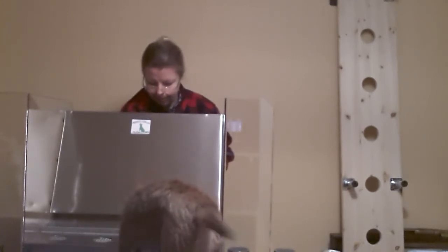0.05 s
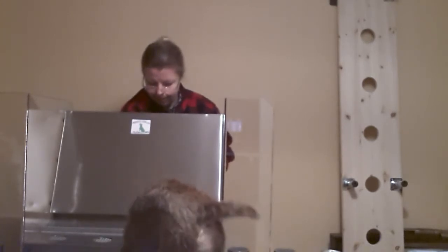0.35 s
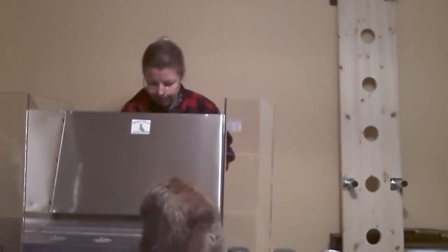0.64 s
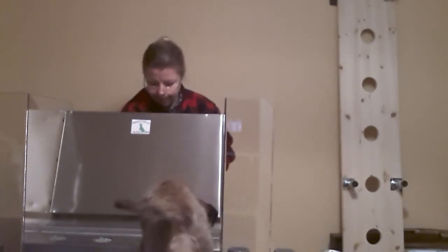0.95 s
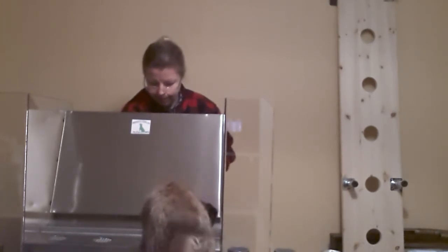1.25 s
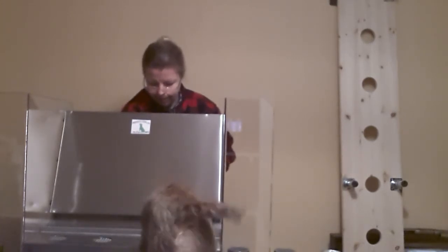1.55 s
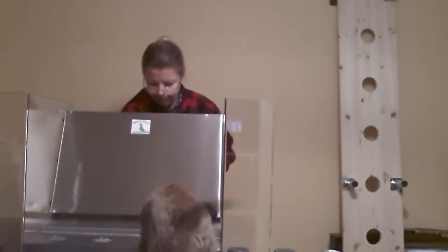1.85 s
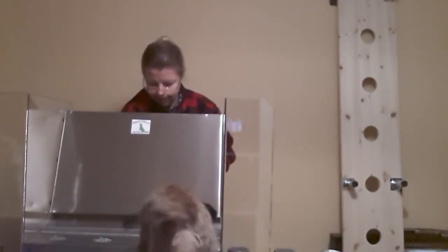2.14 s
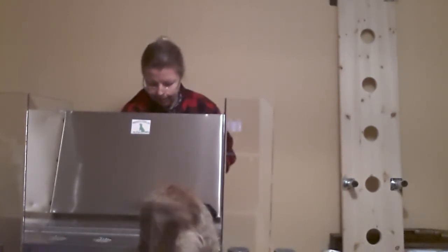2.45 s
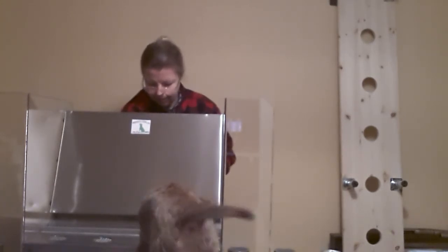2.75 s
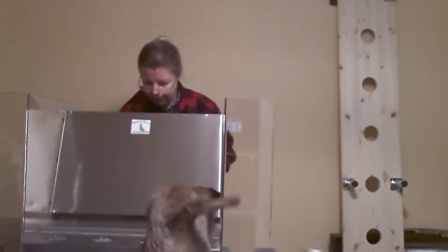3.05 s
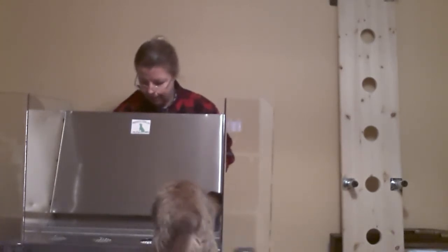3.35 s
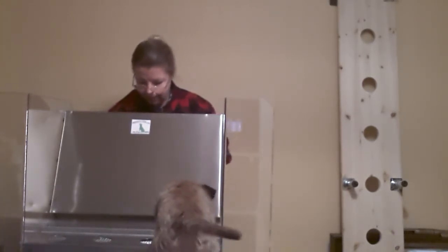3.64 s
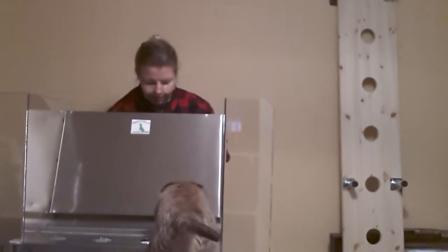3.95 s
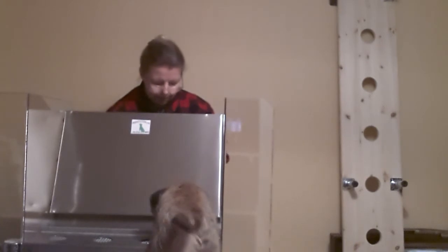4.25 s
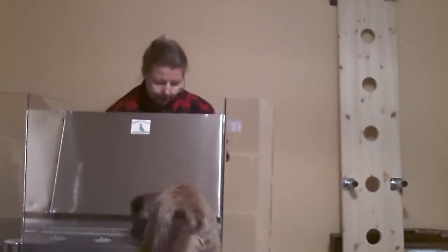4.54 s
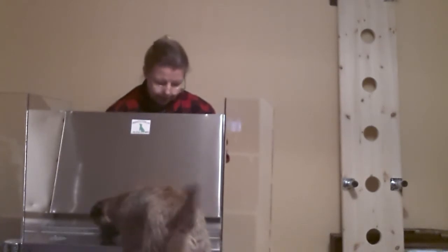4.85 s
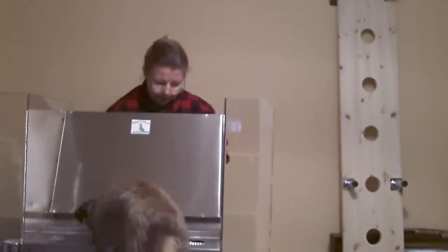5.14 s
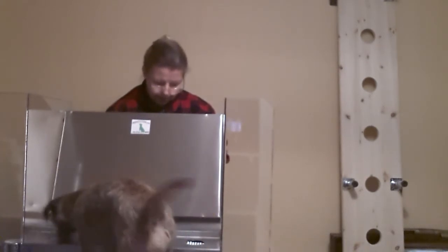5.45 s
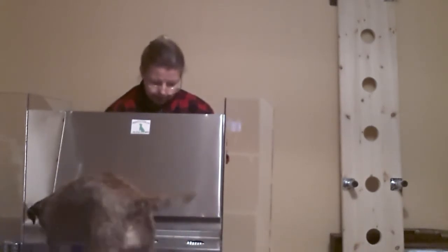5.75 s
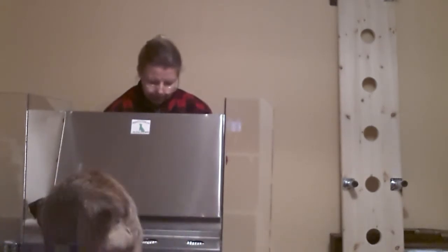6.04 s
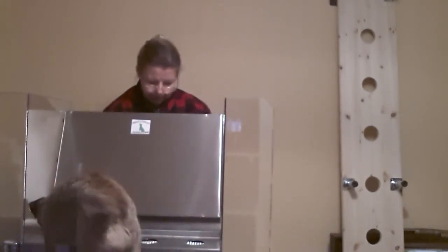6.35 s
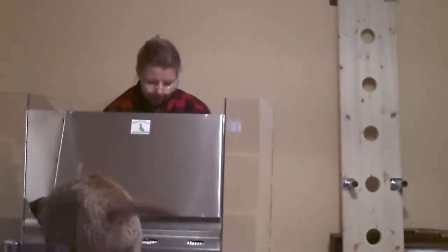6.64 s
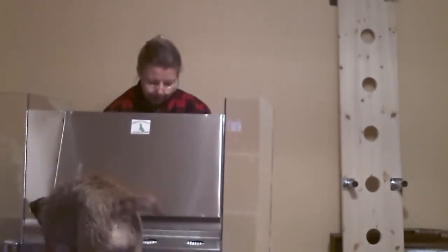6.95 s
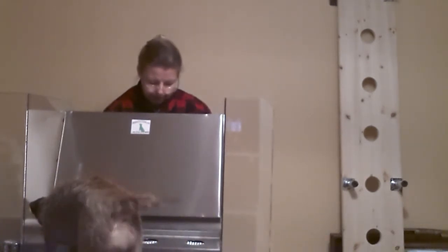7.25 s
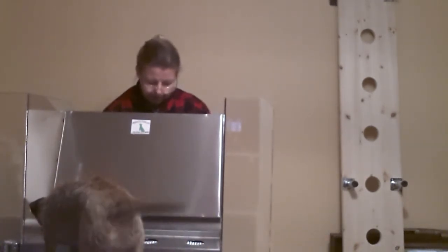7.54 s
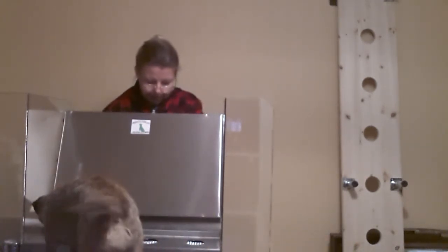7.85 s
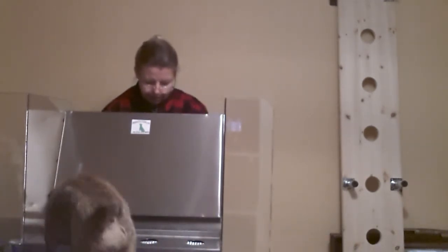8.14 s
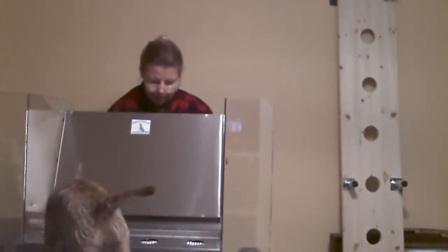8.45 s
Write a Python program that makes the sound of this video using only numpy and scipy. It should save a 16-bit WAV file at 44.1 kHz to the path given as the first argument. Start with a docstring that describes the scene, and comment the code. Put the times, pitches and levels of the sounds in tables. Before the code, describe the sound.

A dog scuffs around a stainless-steel station; a training clicker snaps twice, each time followed by metal clanks and a rolling reward.

```python
"""A stainless-steel scent station clanks and rings as a dog works it in a small, hard room. Twice a training
clicker snaps down and up, its spring leaf flipping in a hollow case, the second press with a low, dull thump;
then a reward clanks through the station and rolls over the sheet metal, making it rumble and sing. Before and
in between, the dog scuffs about, with light taps and soft blips, and bumps the steel, once hard. Faint room
noise and microphone hiss lie under it all."""
import sys
import numpy as np
from scipy import signal
from scipy.fft import rfft, irfft
from scipy.io import wavfile
from scipy.ndimage import uniform_filter1d

SR = 44100
rng = np.random.default_rng(int(sys.argv[2]) if len(sys.argv) > 2 else 0)


def to_wav(sig):
    """Store sig (one row per channel, or 1-D mono) as 16-bit WAV at the path in sys.argv[1].

    Samples outside -1..1 are clipped; the rate is SR.
    """
    pcm = np.clip(np.atleast_2d(sig), -1, 1) * 32767
    pcm = np.round(pcm).astype(np.int16)
    wavfile.write(sys.argv[1], SR, pcm.T)  # frames by channels


N = 379260
EVENT_SIZE = 65536  # samples in one short sound
AGE = np.arange(EVENT_SIZE) / SR
HZ, ALL_HZ = np.fft.rfftfreq(EVENT_SIZE, 1 / SR), np.fft.rfftfreq(N, 1 / SR)

# Levels are relative. A "colour" says how strong each pitch is; t60 is the time to fade by 60 dB.
# colour of the room noise and microphone hiss: f/Hz, level/dB
BACKGROUND_COLOUR = [(12, -62), (20, -34), (106, -6), (217, -8), (249, -10), (328, -10), (455, -13),
                     (567, -14.5), (766, -16.5), (1120, -18), (1290, -18.5), (3020, -22), (3460, -23.5),
                     (7060, -26.5), (14000, -21.5)]
# stereo width of that noise: f/Hz, side minus mid/dB
BACKGROUND_WIDTH = [(60, 3), (110, -3), (200, 0.5), (370, -0.5), (680, 0.5), (1260, 0), (2310, 0),
                    (4250, -0.5), (7810, 0.5), (14400, -0.5)]
# stereo width of sounds in the room, low notes narrow and high ones wide: f/Hz, side minus mid/dB
ROOM_WIDTH = [(30, 9), (120, -21.5), (250, -18), (500, -8), (1000, -0.5), (12000, -0.5)]
# scuffs of the dog: loudest t/s, level/dB
DOG_SCUFFS = [(.105, -48.5), (0.331, -55), (.58, -56), (.815, -52.5), (.915, -45), (1.054, -40),
              (5.22, -52.5), (5.342, -48.5), (5.67, -57), (5.74, -49), (6.016, -46)]
# colour of a scuff, before its treble is turned down: f/Hz, level/dB
FRICTION_COLOUR = [(60, -53), (230, 1), (650, 4), (1000, 0), (2000, -1.5), (4200, -0.5), (6000, -9),
                   (9000, -10.5), (14000, -20.5)]
# soft, hollow blips: t/s, level/dB
SOFT_BLIPS = [(.555, -46), (.685, -44), (1.0, -41), (1.04, -39), (1.09, -40.5), (1.19, -43.5),
              (3.98, -42.5)]
# light, dull taps, the last one the low thump of a clicker press: t/s, level/dB, centre f/Hz
LIGHT_TAPS = [(0.792, -42, 330), (0.903, -39.5, 950), (4.563, -42.5, 2510), (4.84, -43, 518),
              (4.861, -51, 230), (5.108, -43.5, 2343), (5.294, -43.5, 454), (5.365, -30, 530),
              (5.515, -50.5, 248), (5.702, -47.5, 262), (5.992, -48, 1500), (6.025, -41, 260),
              (7.56, -41, 191)]
# how fast a struck thing and the room die away together: f/Hz, t60/s
FADE_TIMES = [(150, 0.43), (400, 0.32), (1000, 0.28), (2700, 0.26), (7000, 0.25), (14000, 0.18)]
# snaps of the clicker: t/s, level/dB, hollow body/dB, top treble/dB, ping f/Hz, ping level/dB
CLICKER_SNAPS = [(2.464, -19, -7, -18, 3210, -10), (2.562, -12.5, -7.5, -29, 6550, -5),
                 (7.556, -12.5, 3.5, -11.5, 3410, -12), (7.67, -11.5, -6, -24, 6330, -3)]
# colour of the clicker: f/Hz, level/dB
CLICKER_COLOUR = [(40, -44), (140, -29), (230, -10), (390, 2), (480, -7.5), (720, 6), (930, -11.5),
                  (1300, -7), (2300, -17.5), (3400, -7.5), (4400, -3), (5600, -9.5), (6500, -3.5),
                  (9500, -9.5), (14500, -17.5)]
# blows on the steel: t/s, level/dB, hardness as cutoff f/Hz, boom/dB, ping f/Hz, ping level/dB
STEEL_BLOWS = [(2.661, -20.5, 880, -12, 355.6, -4), (2.829, -22, 1670, 0, 4270, -5),
               (2.851, -15.5, 1350, 5, 576, -14), (2.869, -19, 1130, 7, 813, -17),
               (2.972, -20, 4100, -20, 2550, 2.5), (2.990, -16, 3300, -31, 1637, -6),
               (3.081, -37.5, 503, 8, 220.4, -1), (3.116, -28, 810, -11, 407.3, -2.5),
               (3.169, -30.5, 4600, -24, 4270, -1.5), (3.347, -35, 400, 34, 228.4, -1),
               (3.415, -42.5, 3125, 1, 4080, 3), (3.821, -47.5, 3480, -12, 3000, 1),
               (4.096, -13.5, 1230, -3, 410.5, -14), (4.099, -23.5, 9000, 8, 4670, -12),
               (4.116, -13.5, 2900, -0.5, 3547, -1.5), (7.522, -49.5, 605, 10, 347, -7.5),
               (7.965, -24, 980, -10, 976, -7), (8.055, -24, 1370, 2, 423, -2.5),
               (8.087, -12.5, 2600, -10, 1139, -9), (8.108, -19, 2400, -8, 2460, 4),
               (8.165, -19, 2020, -18, 443, -14), (8.322, -25, 1020, -2, 578, -8),
               (8.572, -29.5, 1600, 19, 1690, -32)]
# the steel panel's modes (the notes it rings at by itself): f/Hz, level/dB, t60/s
PANEL_MODES = [(218, -11, 0.66), (324, -15, 1.2), (342.7, -14, 0.94), (361.4, 0, 0.22), (410.7, -9, 1.056),
               (426, -8, 0.65), (458, -15, 0.1), (551.7, -2, 0.19), (616, -2.5, 0.41), (715, -10, 0.51),
               (790, -10, 0.47), (904, -22.5, 1.8), (990, -3.5, 0.42), (1150, -10.5, 0.41),
               (1155, -12, 0.24), (1398, -4.5, 0.27), (1458, -6.5, 0.49), (1566, -4, 0.35),
               (2200, -8, 0.17), (2250, -5, 0.19), (2800, -2, 0.24), (3360, -7.5, 0.38)]
# colour of the sheet's crowd of finer modes: f/Hz, level/dB
SHEET_COLOUR = [(30, -50), (100, -25.5), (170, -27), (225, -5.5), (275, -10.5), (340, 0.5), (600, 3),
                (950, -0.5), (1300, -4.5), (2200, -2.5), (3200, -8), (4500, -4), (6000, -11), (9000, -9.5),
                (14000, -49.5)]
# rattling from a rolling reward or, faintly, the dog's weight: t/s, level/dB, length/s, hiss/dB
RATTLES = [(2.7, -32, .76, -1), (4.69, -60.5, 0.54, -2.5), (8, -31, .76, -3)]
# colour of rolling on the sheet: f/Hz, level/dB
ROLLING_COLOUR = [(40, -31), (120, -17.5), (180, -5.5), (225, 6), (275, -3.5), (380, 2), (650, -3),
                  (1000, -7), (1600, -13), (4200, -14), (6000, -23.5), (9000, -25.5), (14000, -49.5)]


def amp(db):
    """Turns decibels into a gain."""
    return 10 ** (np.asarray(db) / 20)


def unit(x):
    """Scales a signal to an average (rms) size of 1."""
    return x / np.sqrt(np.mean(x ** 2) + 1e-20)


def read(points, hz):
    """Reads between a table's rows, on a log-frequency axis."""
    f, value = np.transpose(points)
    return np.interp(np.log(hz + 1), np.log(f + 1), value)


def below(hz, corner_hz):
    """Gain that keeps the lows and falls 12 dB per octave above the corner."""
    return 1 / np.sqrt(1 + (hz / corner_hz) ** 4)


def add(mix, s, sound):
    """Mixes a stereo sound in at s seconds."""
    at = round(s * SR)
    sound = sound[:, max(-at, 0):]
    part = mix[:, max(at, 0):][:, :sound.shape[1]]
    part += sound[:, :part.shape[1]]


def diffuse(pair, colour, width=ROOM_WIDTH):
    """Colours two noises: both ears share one (mid), the other sets them apart (side)."""
    size = pair.shape[1]
    mid, side = rfft(pair) * colour
    side = side * amp(read(width, np.fft.rfftfreq(size, 1 / SR)))
    return unit(irfft(np.array([mid + side, mid - side]), size))


def grains(size, spread_db):
    """Two dense streams of tiny contacts of uneven strength."""
    noise, strength = rng.standard_normal((2, 2, size))
    return noise * amp(spread_db * np.clip(strength, -3, 3))


def background(level_db=-55):
    """Steady room noise and microphone hiss."""
    colour = amp(read(BACKGROUND_COLOUR, ALL_HZ))
    return amp(level_db) * diffuse(rng.standard_normal((2, N)), colour, BACKGROUND_WIDTH)


def scuffs(lead_s=0.19, tail_t60=0.33, shuffle_span_s=(4.1, 6.4), shuffle_db=-56.5, count=8):
    """Grainy rubbing swells and fades into the room; the dog adds faint shuffles as it crosses."""
    out = np.zeros((2, N))
    t = AGE - lead_s
    shuffles = [(s + .04 * rng.standard_normal(), shuffle_db + 0.5 * rng.standard_normal())
                for s in np.linspace(*shuffle_span_s, count)]
    colour = amp(read(FRICTION_COLOUR, HZ) - np.log2(1 + HZ / 250))  # treble falls 1 dB per octave
    for s, db in DOG_SCUFFS + shuffles:
        swell_s = .025 * 2 ** ((-45 - db) / 9)  # 9 dB stronger is twice as quick
        swell = np.exp(-.5 * (t / swell_s) ** 2)
        tail = amp(-60 * (np.hypot(t, swell_s) - swell_s) / tail_t60)
        friction = diffuse(grains(EVENT_SIZE, spread_db=4), colour)
        add(out, s - lead_s, amp(db) * np.where(t < 0, swell, tail) * friction)
    return out


def rise_and_fade(rise_s, t60):
    """The loudness of a struck note: quickly up, then dying away."""
    return (1 - np.exp(-AGE / rise_s)) * amp(-60 * AGE / t60)


def ping(hz, t60, width=0.0091, rise_s=0.0052):
    """Close modes beat together as one rough note; width is a share of its pitch."""
    cluster = diffuse(rng.standard_normal((2, EVENT_SIZE)), below(HZ - hz, width * hz))
    shape = rise_and_fade(rise_s, t60)
    return unit(cluster * shape) * np.sqrt(np.mean(shape ** 2))


def blips(pitch_hz=624):
    """Soft, hollow notes with a blurred pitch."""
    out = np.zeros((2, N))
    for s, db in SOFT_BLIPS:
        add(out, s, amp(db) * ping(pitch_hz, t60=0.12, width=0.054, rise_s=0.013))
    return out


def crash(colour, rise_s, linger_db, linger_t60):
    """Countless modes and wall echoes build up in milliseconds and die faster in the treble."""
    noise = diffuse(grains(EVENT_SIZE, spread_db=1.5), colour)
    hz, t, bands = signal.stft(noise, SR, nperseg=256)
    fade = amp(-60 * t / read(FADE_TIMES, hz)[:, None])
    linger = amp(linger_db - 60 * t / linger_t60)
    _, sound = signal.istft(bands * (fade + linger), SR, nperseg=256)
    return sound[:, :EVENT_SIZE] * (1 - np.exp(-AGE / rise_s))


def taps(direct_s=0.0063, room_db=-7):
    """Damped contacts: a short, sharp knock, then a weaker answer from the room."""
    out = np.zeros((2, N))
    for s, db, hz in LIGHT_TAPS:
        octaves = max(0.96 - 0.18 * np.log2(hz / 500), .1)  # higher taps span fewer octaves
        colour = np.exp(-.5 * (np.log2((HZ + 1) / hz) / octaves) ** 2)
        knock = crash(colour, rise_s=0.002, linger_db=-19.5, linger_t60=0.85)
        add(out, s, amp(db) * knock * (np.exp(-AGE / direct_s) + amp(room_db)))
    return out


def ripple(depth_db, bins, above_hz):
    """The peaks and dips, in dB, that an object's many small modes put in all its sounds."""
    uneven = uniform_filter1d(rng.standard_normal(len(HZ)), bins)
    rounded = unit(uniform_filter1d(uneven, bins))
    return depth_db * rounded * (1 - below(HZ, above_hz))


def clicker(body_hz=1700, top_hz=9000):
    """A spring leaf flips in its hollow case, once when pressed and once when let go."""
    out = np.zeros((2, N))
    case_db = read(CLICKER_COLOUR, HZ) + ripple(depth_db=1, bins=110, above_hz=1200)
    for s, db, body_db, top_db, ping_hz, ping_db in CLICKER_SNAPS:
        colour = amp(case_db + body_db * below(HZ, body_hz) + top_db * (1 - below(HZ, top_hz)))
        snap = crash(colour, rise_s=0.0062, linger_db=-44, linger_t60=1)
        add(out, s, amp(db) * (snap + amp(ping_db) * ping(ping_hz, t60=0.22)))
    return out


def mode(hz, t60, rise_s=0.0025):
    """One pure, dying note; high ones reach the two microphones more out of step."""
    start = rng.uniform(-np.pi, np.pi)
    apart = rng.choice([-1, 1]) * np.arctan(amp(read(ROOM_WIDTH, hz)))
    phase = 2 * np.pi * hz * AGE + start + np.array([[apart], [-apart]])
    return np.sqrt(2) * np.sin(phase) * rise_and_fade(rise_s, t60)


def panel_ring(hard_hz, spread_db=3.6):
    """Each spot on the panel favours other modes, and a soft blow misses the high ones."""
    hz, db, t60 = np.transpose(PANEL_MODES)
    gains = amp(db + spread_db * rng.standard_normal(len(hz))) * below(hz, hard_hz)
    gains /= np.linalg.norm(gains)
    return sum(gain * mode(f, life) for f, gain, life in zip(hz, gains, t60))


def struck_spot(hz, blow_db, clear_db=-19, clean_hz=900):
    """The note of the spot that is hit: a firm blow pings clearly, a light one only ticks."""
    mode_hz, _, mode_t60 = np.transpose(PANEL_MODES)
    t60 = np.interp(hz, mode_hz, mode_t60)  # its life follows the modes around it
    clean = below(hz, clean_hz)  # low modes stand alone, high ones crowd together
    width = .009 * (1 + max(clear_db - blow_db, 0) / 3)
    return clean * mode(hz, t60) + np.sqrt(1 - clean ** 2) * ping(hz, 0.6 * t60, width)


def clanks(boom_hz=270, firm_db=-24.5, rebound_db=-17, settle_s=0.066):
    """Each blow sets off the crash of the sheet, a ping of the struck spot and the panel's ring."""
    out = np.zeros((2, N))
    sheet_db = read(SHEET_COLOUR, HZ) + ripple(depth_db=2.5, bins=45, above_hz=700)
    rests = np.diff(np.transpose(STEEL_BLOWS)[0], prepend=0)
    for (s, db, hard_hz, boom_db, ping_hz, ping_db), rest_s in zip(STEEL_BLOWS, rests):
        contact = below(HZ, hard_hz) * below(HZ, 2 * hard_hz)  # a soft, long contact holds no treble
        colour = amp(sheet_db + boom_db * below(HZ, boom_hz)) * contact
        sheet = crash(colour, rise_s=.003, linger_db=-26.5, linger_t60=0.88)
        spot = amp(ping_db) * struck_spot(ping_hz, db)
        ring_db = -1 - 0.46 * max(db - firm_db, 0)  # the ring is a smaller share of a strong blow
        ring_db += rebound_db * np.exp(-rest_s / settle_s)  # a blow close behind another rings less
        add(out, s, amp(db) * (sheet + spot + amp(ring_db) * panel_ring(hard_hz)))
    return out


def rattle_strength(start_s, db, length_s, rise_s=.17, sag_db_per_s=7, stop_db=-15.5, stop_s=.17):
    """One spell of rattling builds up, slowly loses energy, then sinks to a tremble."""
    t = np.maximum(np.arange(N) / SR - start_s, 0)
    stopped = 1 - np.exp(-np.maximum(t - length_s, 0) / stop_s)
    return np.minimum(t / rise_s, 1) * amp(db - sag_db_per_s * t + stop_db * stopped)


def rolling(bumps_per_s=70, bump_s=0.0416, ticks_per_s=28, tick_s=0.061, rub=0.37, slide=.7, ring_db=-5):
    """Uneven bumps keep the sheet rumbling and the panel singing; small ticks roughen the hiss."""
    chance = np.array([[bumps_per_s], [ticks_per_s]]) / SR
    bumps, ticks = (rng.random((2, N)) < chance) * rng.uniform(0.25, 1, (2, N))
    contact = unit(rub + signal.oaconvolve(bumps, np.exp(-AGE / bump_s))[:N])
    chatter = unit(slide + signal.oaconvolve(ticks, np.exp(-AGE / tick_s))[:N])
    friction = diffuse(grains(N, spread_db=5.5), amp(read(ROLLING_COLOUR, ALL_HZ)))
    low = irfft(rfft(friction) * below(ALL_HZ, corner_hz=1100), N)
    singing = unit(signal.oaconvolve(bumps[None], panel_ring(hard_hz=800), axes=1)[:, :N])
    rumble = low * contact + amp(ring_db) * singing
    hiss = (friction - low) * chatter
    return sum(rattle_strength(s, db, length_s) * (rumble + amp(hiss_db) * hiss)
               for s, db, length_s, hiss_db in RATTLES)


def scene(low_cut_hz=110, left_db=2.4, right_db=1.6):
    """Station, clicker and dog, a little left of centre, over the quiet of the room."""
    low_cut = signal.butter(2, low_cut_hz, "highpass", fs=SR, output="sos")
    steel = signal.sosfilt(low_cut, clanks() + rolling())  # the steel sounds carry almost no deep bass
    sources = steel + clicker() + taps() + scuffs() + blips()
    return amp([[left_db], [right_db]]) * sources + background()


def record(dry, top_hz=14600):
    """Clips peaks at full scale and cuts off the highest treble."""
    low_pass = signal.firwin(511, top_hz, window=("kaiser", 9), fs=SR)
    return signal.oaconvolve(np.clip(dry, -1, 1), low_pass[None], "same", axes=1)


dry = scene()
out = record(dry)
to_wav(out)
```